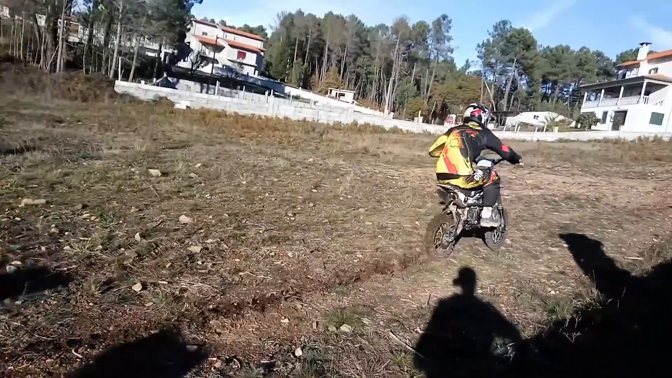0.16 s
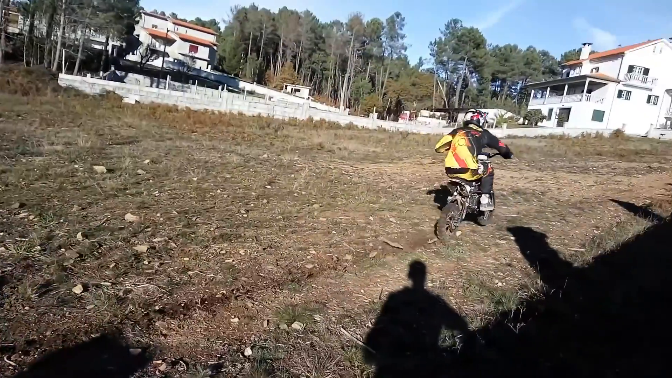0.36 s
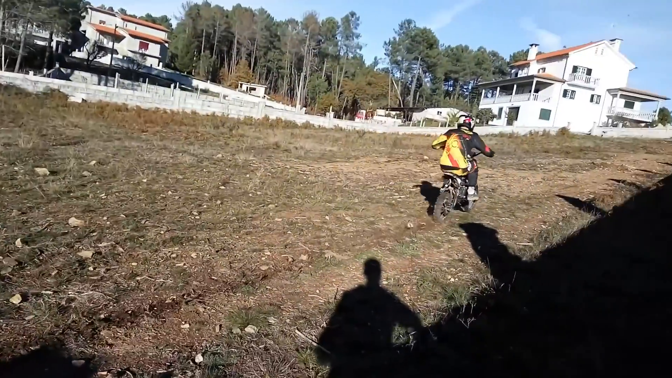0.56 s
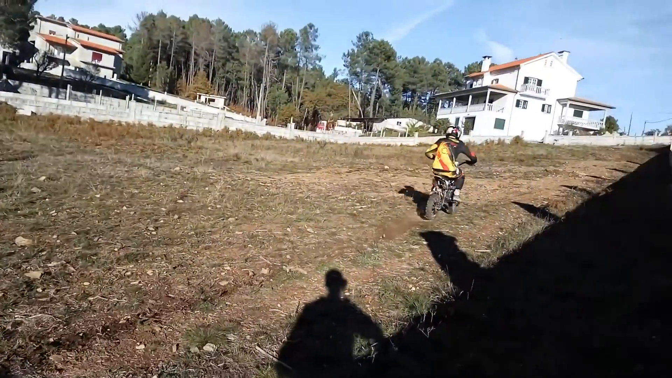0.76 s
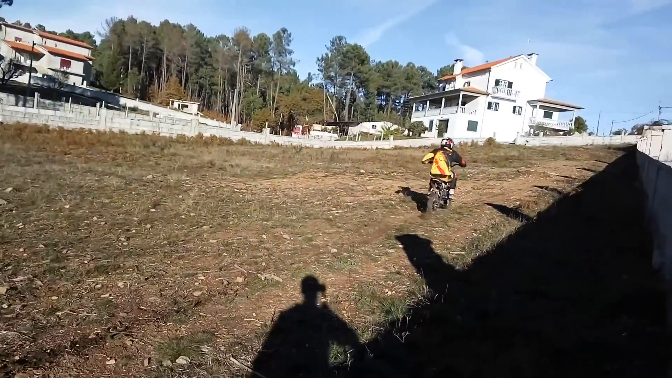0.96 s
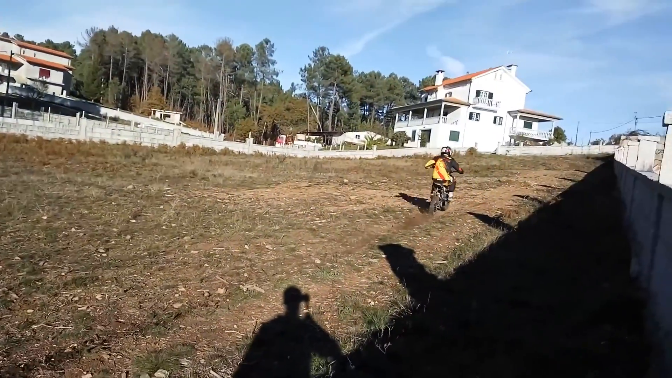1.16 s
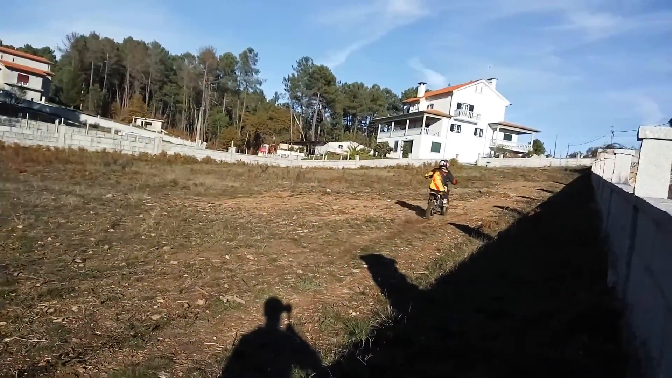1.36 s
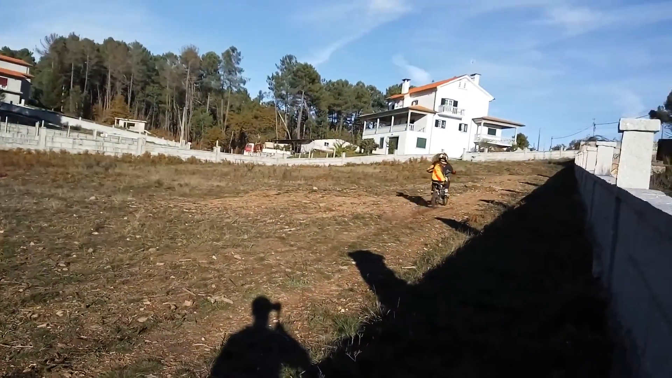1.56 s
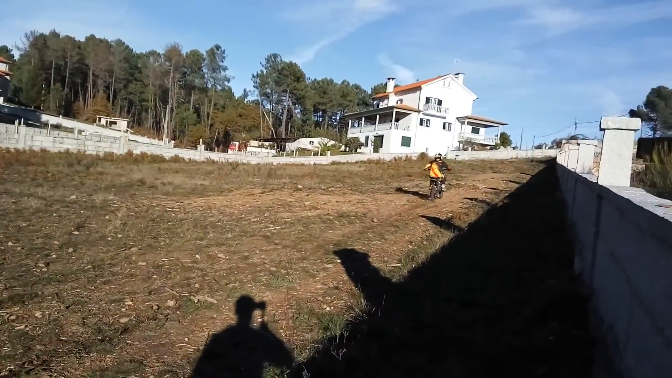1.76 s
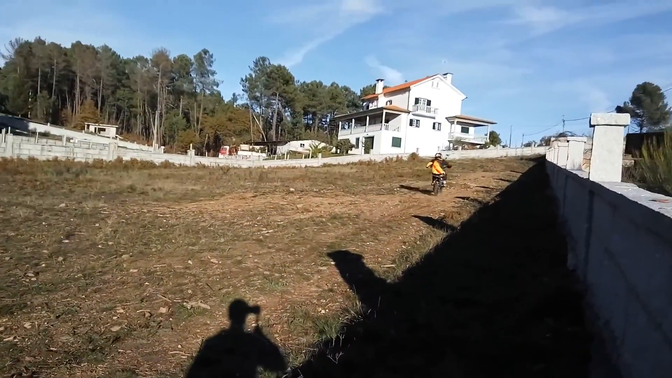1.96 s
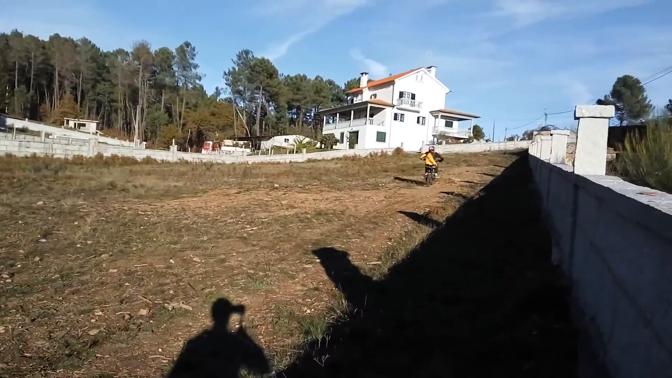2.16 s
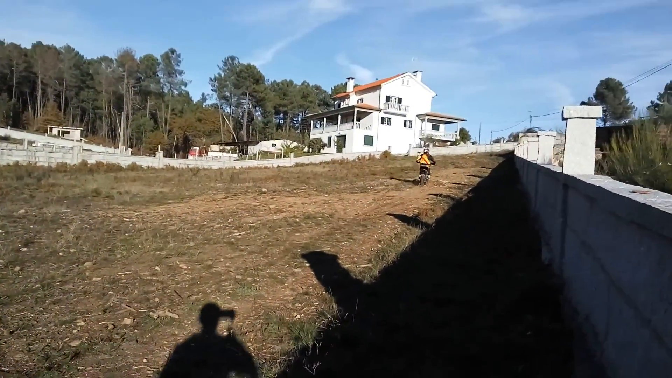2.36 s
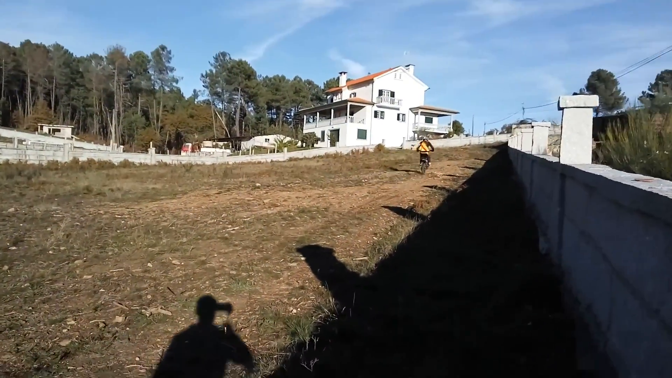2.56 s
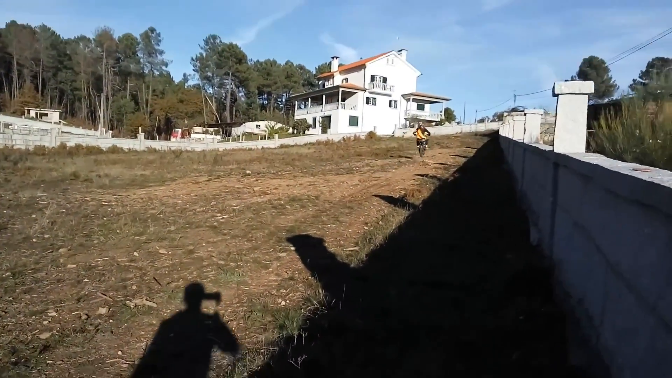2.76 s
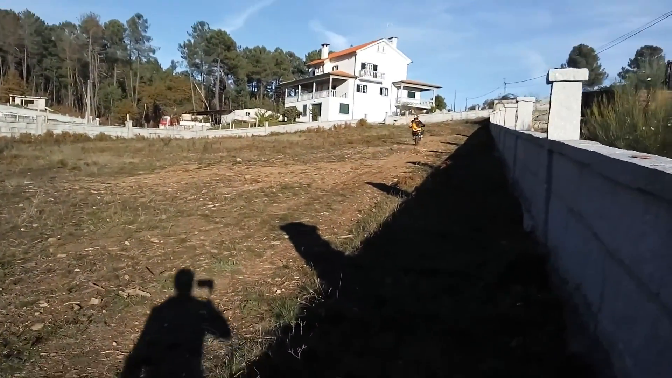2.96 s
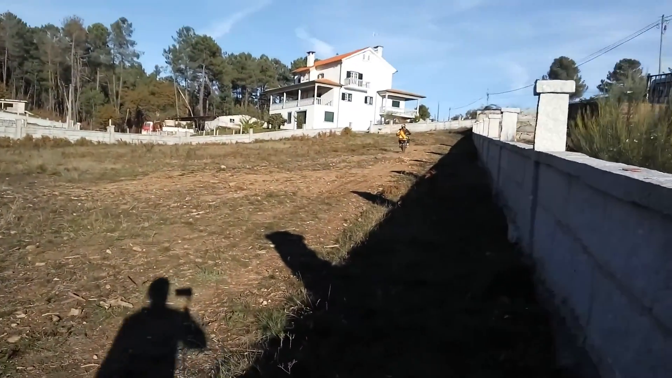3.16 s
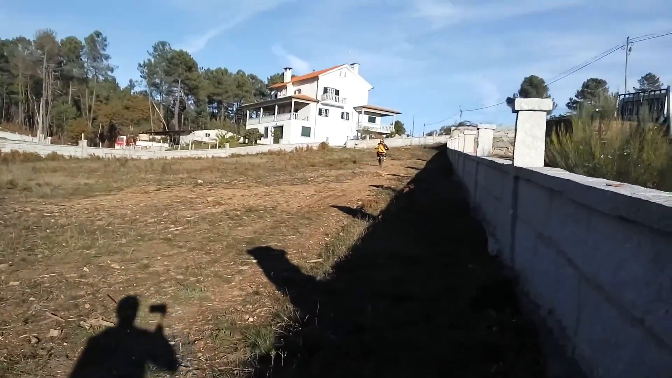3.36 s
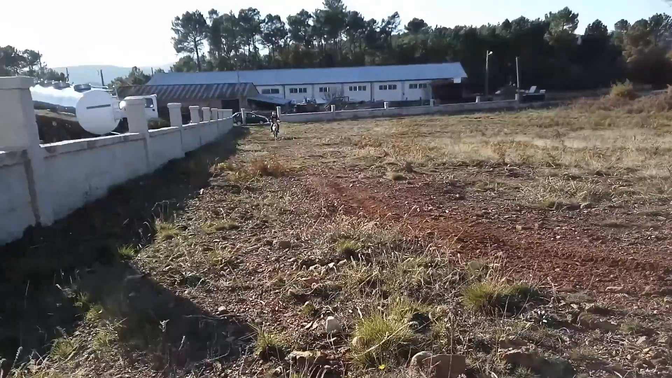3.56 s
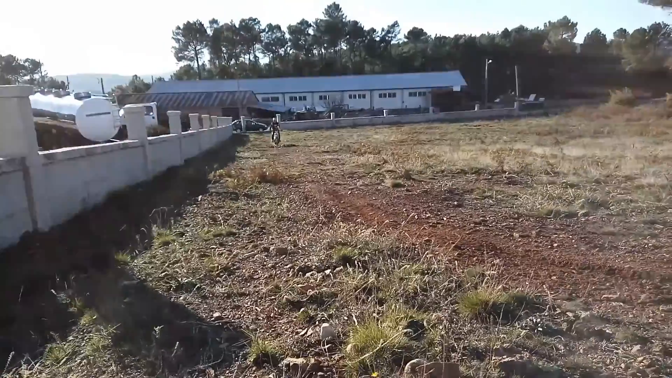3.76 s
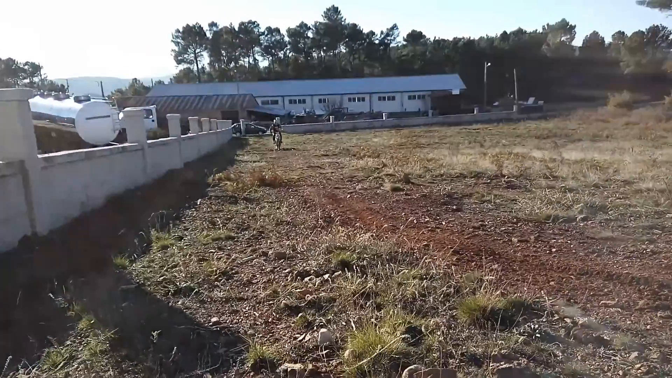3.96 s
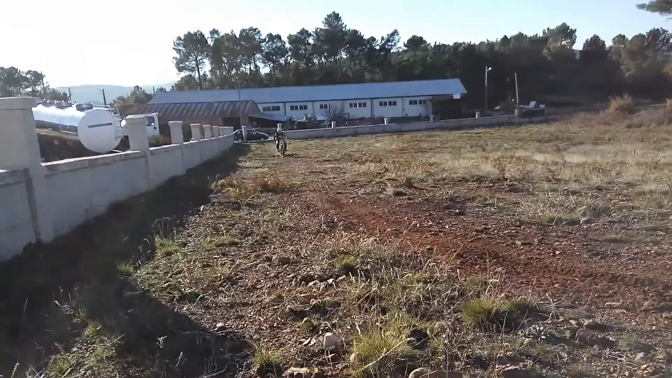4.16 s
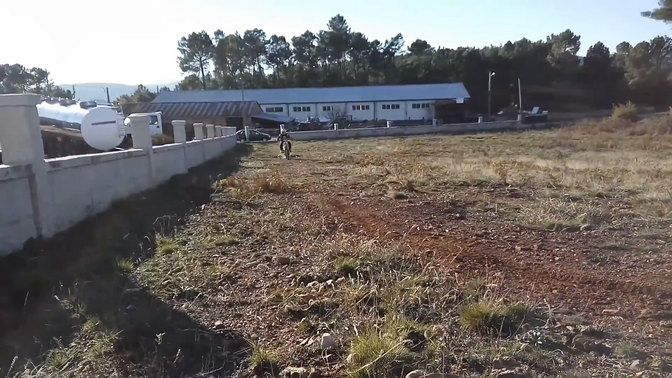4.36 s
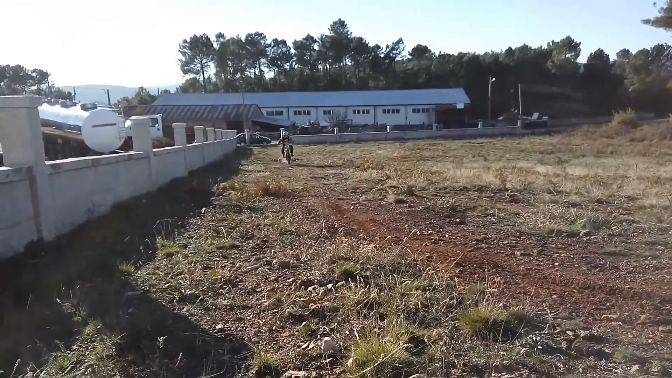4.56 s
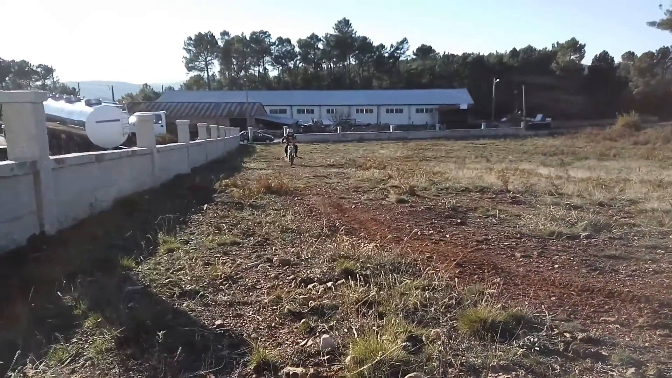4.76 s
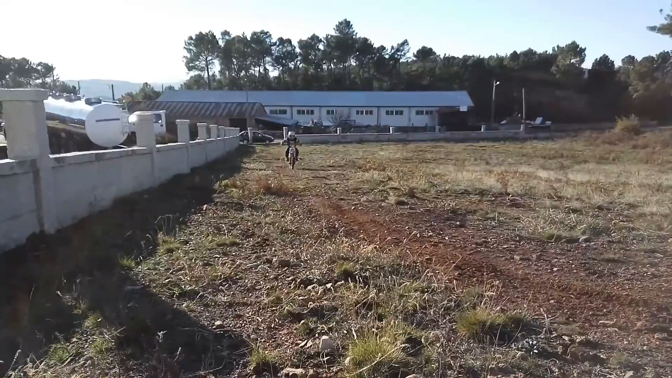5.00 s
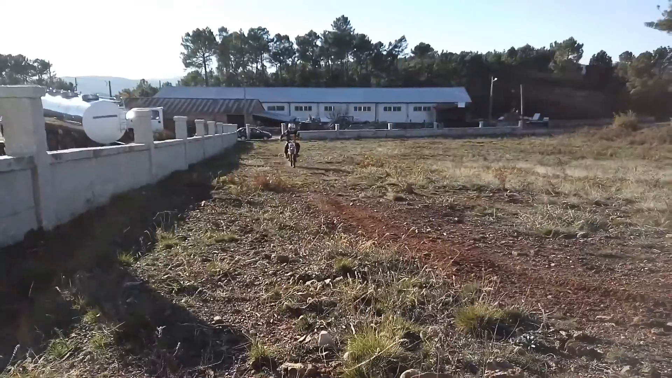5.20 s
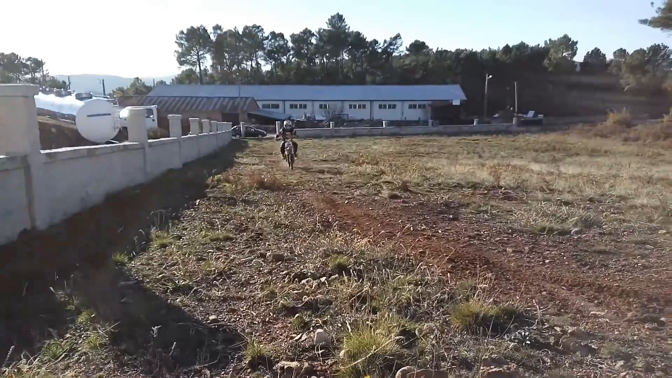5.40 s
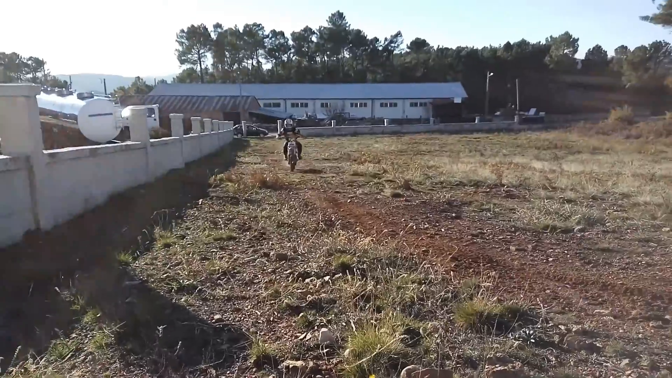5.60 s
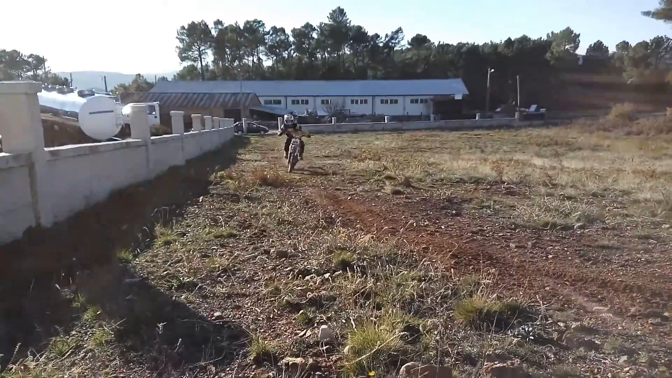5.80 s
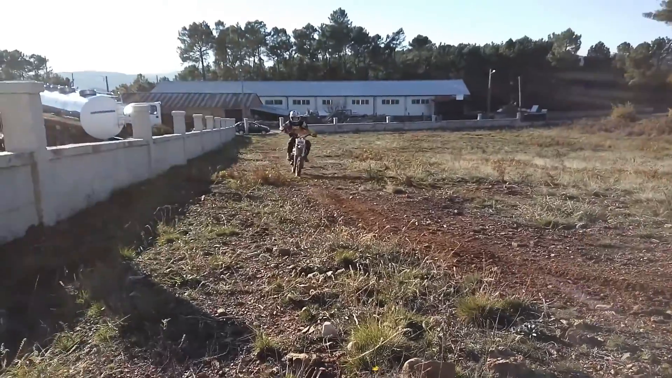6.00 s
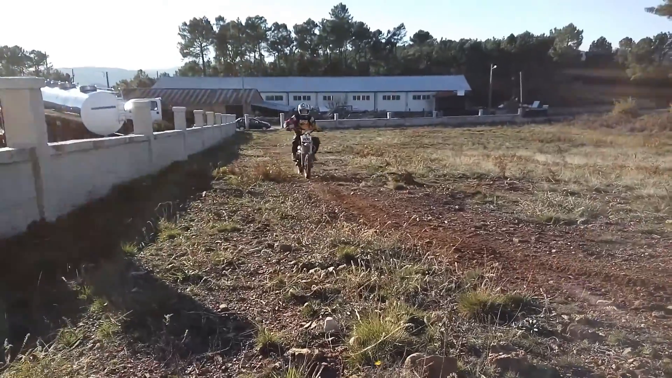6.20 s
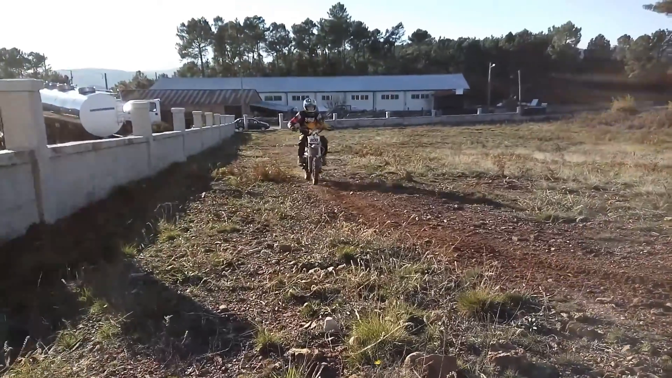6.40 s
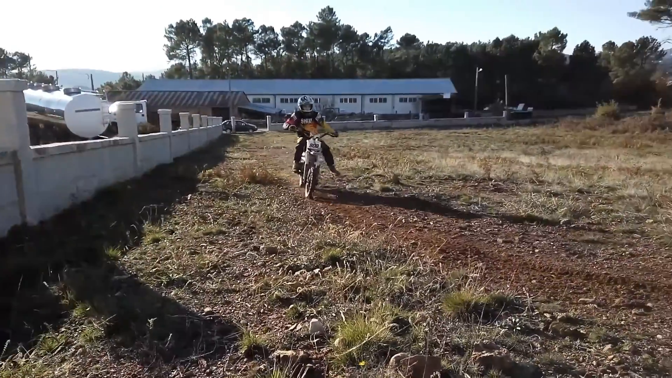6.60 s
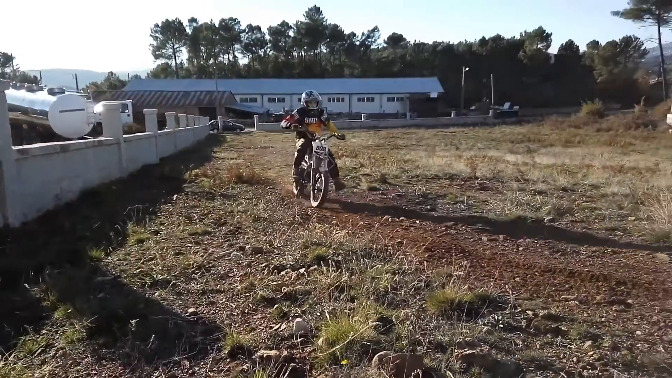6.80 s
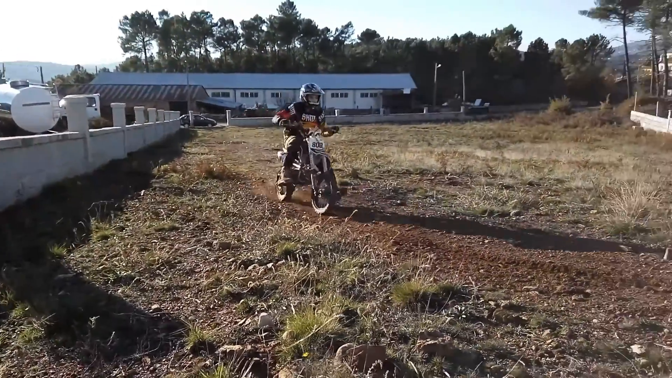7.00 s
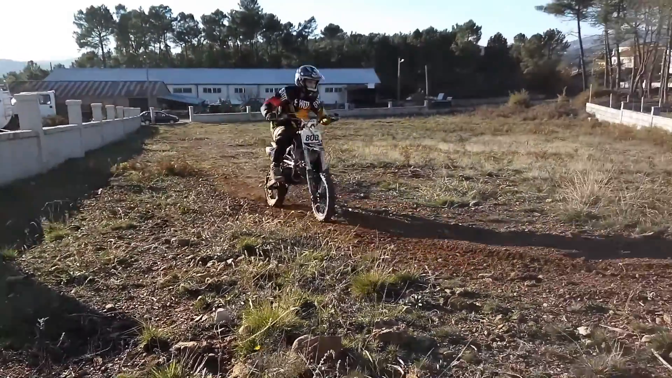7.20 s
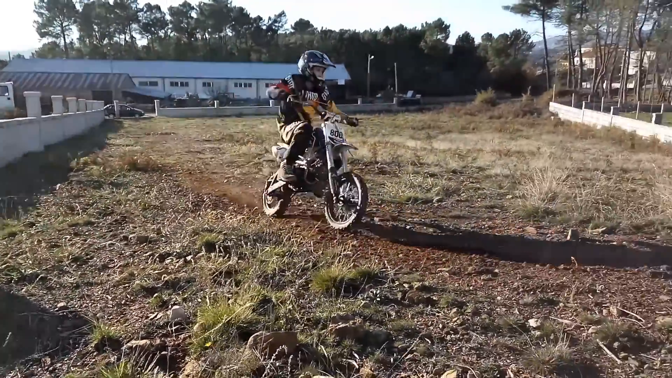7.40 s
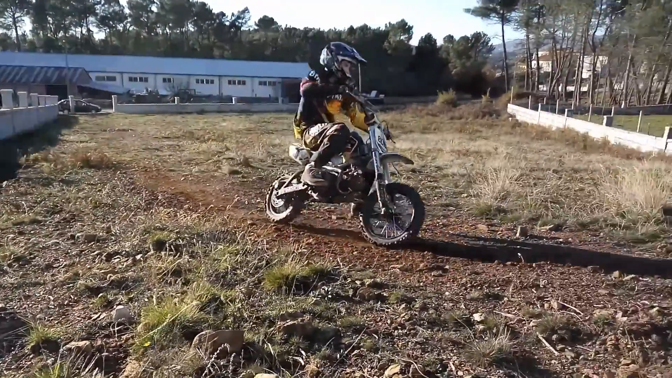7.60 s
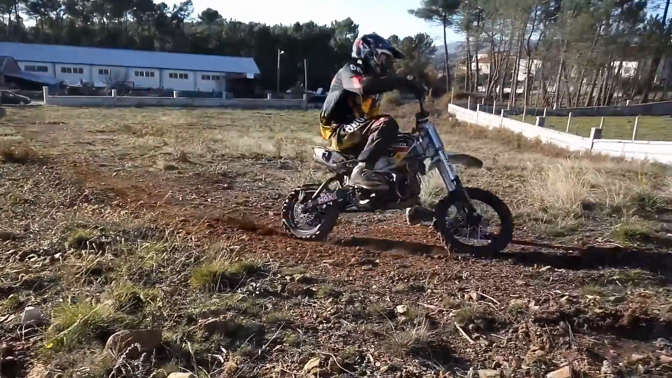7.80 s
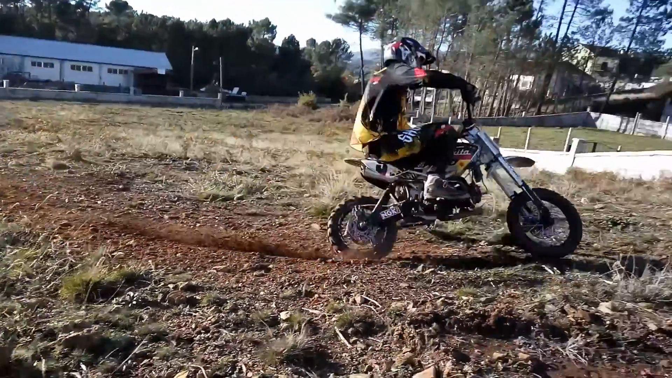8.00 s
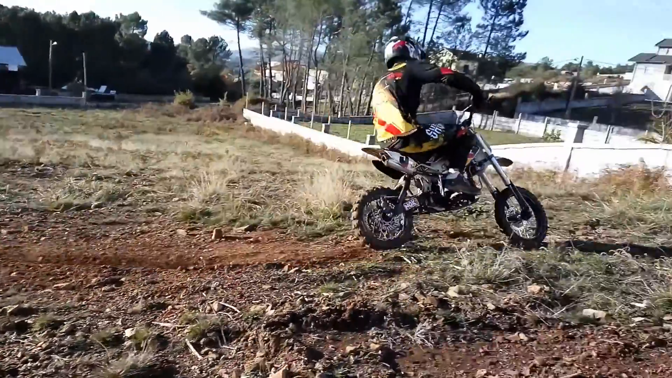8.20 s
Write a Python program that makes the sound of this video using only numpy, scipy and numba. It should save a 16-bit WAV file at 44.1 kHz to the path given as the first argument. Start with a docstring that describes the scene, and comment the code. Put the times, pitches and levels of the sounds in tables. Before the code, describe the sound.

A small single-cylinder dirt bike revs close by and rides away over an open field, its buzzy exhaust rising and dipping as it grows faint and dull. It then comes back with short bursts of throttle, slows to a low putter and gives two loud blips near the microphone. Light engine rattle runs under the exhaust, with faint wind on the microphone.

```python
"""Open field with a low wall. A small single-cylinder four-stroke dirt bike rides away, returns,
and brakes close by. Each firing rings the exhaust and lets out a puff of gas; valves and chain
rattle in the casing. Ground and wall return echoes; distance dulls the treble. Wind brushes the
two microphone ports, and the loudest firings overload the input."""
import sys
import numpy as np
from scipy import signal
from scipy.io import wavfile
from scipy.ndimage import uniform_filter1d, map_coordinates
from numba import njit

SR = 44100
rng = np.random.default_rng(int(sys.argv[2]) if len(sys.argv) > 2 else 0)


def store_pcm(level_fs):
    """Save levels as 16-bit WAV."""
    pcm = np.round(np.clip(level_fs, -1, 1) * 32767).astype(np.int16)
    wavfile.write(sys.argv[1], SR, np.atleast_2d(pcm).T)


N = 363825

# Firing rate: t/s, f/Hz
FIRING_RATE = [(0, 71.6), (.14, 72.4), (.41, 83.3), (.76, 85), (.97, 73.6), (1.11, 57), (1.46, 62),
               (1.88, 69.2), (1.95, 65.7), (2.23, 56.8), (2.35, 53), (2.55, 68), (2.7, 65.6), (2.77, 56),
               (2.88, 59), (3.07, 50.5), (3.14, 45), (3.25, 55), (3.41, 64.6), (3.55, 59.3), (3.85, 57),
               (3.99, 62.3), (4.17, 58.6), (4.69, 70.9), (4.89, 66.3), (5.0, 59), (5.1, 67.7), (5.48, 49.4),
               (5.78, 54.2), (6.03, 61), (6.19, 48.5), (6.64, 37), (6.89, 34.2), (6.97, 28.2), (7.1, 28.4),
               (7.24, 30), (7.31, 38.6), (7.4, 41.3), (7.48, 30), (7.56, 30), (7.64, 31), (7.72, 36.4),
               (7.8, 39.2), (7.97, 44.8), (8.04, 43), (8.14, 39.6), (8.25, 32.6)]
# Moments on which a firing is timed: t/s
FIRING_ANCHORS = [1.103, 1.312, 1.455, 2.391, 2.798, 2.868, 5.039, 6.776, 6.855, 7.133, 7.273, 7.73, 7.791,
                  8.003]
# Rear wheel skips a bump, engine races: t/s, added rate/Hz
WHEEL_HOPS = [(1.361, 13), (2.068, 9.6), (4.291, 7.3)]
# Throttle: open/s, close/s, gas boost/dB
THROTTLE_BURSTS = [(-.1, .76, 2.5), (1.04, 1.3, 8.5), (1.47, 1.58, 3), (1.9, 2.06, 2), (2.4, 2.72, 2.5),
                   (2.78, 2.95, 2), (3.22, 3.41, 2.5), (4.24, 4.87, 6), (5.02, 5.16, 10), (5.91, 6.04, 9.5),
                   (7.08, 7.38, 10.5), (7.73, 8.03, 9.5)]
# Engine stumbles: start/s, stop/s, added scatter/dB
STUMBLES = [(2.34, 2.36, 8.5), (2.77, 2.8, 9.5), (3.08, 3.15, 5), (6.7, 7.05, 3), (8.12, 8.25, 2)]
# Levels, throttle shut: t/s, boom/dB, ring/dB, bark/dB, howl/dB, gas/dB, rattle/dB
SHUT_LEVELS = [(0, -9, -25, -18, -29.5, -24.5, -25.5), (.4, -11, -25, -17.5, -31.5, -19, -22),
               (.79, -18, -19, -19.5, -31, -24.5, -27), (.99, -18, -24, -27, -51, -28, -20),
               (1.06, -16.5, -23.5, -22, -31, -29, -54), (1.4, -11, -26, -21, -31, -32, -41),
               (2.0, -14.5, -22.5, -22.5, -38.5, -33.5, -40.5), (2.3, -22.5, -26, -31, -69, -47, -40.5),
               (2.7, -23.5, -30.5, -33.5, -67, -46.5, -46), (2.77, -20.5, -30.5, -36.5, -64, -45, -44.5),
               (2.9, -25.5, -21.5, -34.5, -65, -45.5, -50.5), (3.15, -26, -27, -39.5, -61, -46.5, -50.5),
               (3.4, -25.5, -30, -31, -78, -46.5, -47), (3.46, -30.5, -31, -39, -59, -46.5, -45.5),
               (3.9, -28, -28, -34, -54, -70, -52.5), (3.97, -24, -40, -39.5, -57, -74, -49.5),
               (4.2, -19.5, -43.5, -27.5, -48, -69, -44), (4.6, -16, -63, -22, -39, -58, -36.5),
               (5.0, -18, -30.5, -23.5, -44.5, -46, -38.5), (5.3, -19.5, -31.5, -24.5, -41, -46, -38.5),
               (5.55, -24, -30, -29.5, -45, -64, -44), (6.0, -19, -23, -27.5, -40.5, -43, -41.5),
               (6.22, -22.5, -24.5, -34, -47, -45, -39.5), (6.9, -26, -20, -32, -57, -43, -43),
               (6.96, -33, -30, -43, -83, -45, -38), (7.06, -31, -29, -44, -63, -50, -53.5),
               (7.2, -20, -19.5, -27.5, -63, -40, -44.5), (7.34, -20.5, -21, -27, -59, -41, -42.5),
               (7.45, -24, -30, -41.5, -75, -40.5, -40.5), (7.9, -18, -13, -22.5, -51, -28.5, -32),
               (8.12, -10.5, -16, -31, -49, -31, -33), (8.25, -12.5, -26, -74, -62, -37, -39.5)]
# Silencer boom: f/Hz, width/Hz, level/dB
SILENCER_MODES = [(124.7, 39.5, 18), (72.5, 18, -21)]
# Pipe ring: t/s, f/Hz, width/Hz
PIPE_RING = [(0, 239, 98), (6.0, 244, 85.7), (6.85, 217, 60), (7.03, 171, 28), (7.25, 252, 65),
             (7.55, 203.5, 61), (8.25, 234, 91)]
# Tailpipe as the gas heats and the bike turns: t/s, bark/Hz, howl/Hz, crack/dB
TAILPIPE = [(0, 486, 950, -31), (.6, 507, 1080, -27), (.95, 435, 795, -39), (1.08, 393, 656, -29),
            (1.35, 370, 675, -30), (2.2, 395, 640, -41.5), (2.6, 489, 640, -54), (4.3, 481, 827, -68),
            (4.55, 478, 894, -69), (4.96, 398, 770, -66), (5.1, 469, 813, -61), (5.45, 347, 730, -72),
            (5.8, 351, 610, -69), (6.9, 330, 566, -73), (8.25, 398, 630, -57)]
# Tailpipe crack: f/Hz, width/Hz, level/dB
CRACK_MODES = [(1008, 130, -7), (1495, 110, -1.5), (1830, 120, 2.5), (2350, 180, -11.5), (3100, 140, -8),
               (3800, 160, -6.5)]
# Pipe sings: start/s, stop/s, level/dB
SINGING_SPANS = [(0.268, 0.355, -10.5), (0.422, 0.752, -19), (0.763, 0.998, -20.5), (1.44, 2.09, -28),
                 (3.676, 3.912, -17.5), (4.216, 4.366, -28), (4.399, 4.869, -29), (5.093, 5.462, -27),
                 (5.558, 5.919, -32), (6.06, 6.301, -11), (6.068, 6.234, -19.5), (6.298, 6.445, -13.5),
                 (6.47, 6.679, -14.5), (6.69, 6.92, -28), (7.389, 7.721, -9.5)]
# Firing harmonic sung in each span: order
SINGING_ORDERS = [3, 6, 5, 6, 4, 8, 7, 7, 6, 5, 6, 5, 6, 5, 4]
# Gas noise: f/Hz, width/Hz, level/dB
GAS_BANDS = [(1085, 670, -3.5), (1650, 570, -4.5), (2207, 430, -1.5), (5300, 6100, -8.5)]
# Casing resonances: f/Hz, width/Hz, level/dB
CASING_MODES = [(1953, 50, -6.5), (2730, 70, -4.5), (3617, 98, -3), (4210, 220, -3), (4717, 160, -3),
                (5280, 54, -3.5), (5800, 54, -8.5), (6280, 47, -8.5)]
# Single casing rings that stand out: start/s, stop/s, f/Hz, level/dB
CASING_RINGS = [(.8, .93, 1183, -30.5), (0.796, 1, 1564, -30), (.87, 0.997, 1940, -28),
                (0.838, 1.003, 3570, -22), (.87, 0.996, 6090, -26), (1.037, 1.236, 3780, -22),
                (1.126, 1.317, 3260, -25.5), (5.58, 5.78, 2700, -46), (5.92, 6.038, 4150, -41),
                (6.03, 6.301, 2740, -42), (6.028, 6.152, 2250, -40.5), (6.24, 6.45, 3600, -43.5)]
# Bike to ports: t/s, ground echo/ms, left lag/samples, wall echo/ratio, bass loss/ratio, top loss/ratio
SOUND_PATH = [(0, 0.65, 4.5, 0.12, 0.095, .05), (1, 0.59, 5, 0.048, 0.14, 0.32),
              (2, 0.39, 4.5, 0.077, 0.36, 0.15), (3.4, 0.25, 3, 0.11, 0.47, 0.64),
              (3.42, 0.24, -1.5, 0.12, 1, 0.82), (6, 0.27, -1.2, 0.11, 0.26, 0.85),
              (6.85, 0.42, -1.5, 0.32, 0.14, 0.8), (7.5, 0.47, 0, .4, 0.13, 0.9),
              (7.85, 0.75, 1, 0.65, 0.08, 0.071)]

BOOM_PULL, RING_PULL, BARK_PULL, SNARL_PULL, RATTLE_PULL = 0.36, 0.11, 0.54, 1.36, 0.85  # dB/throttle dB
HOP_S, OPEN_S, CLOSE_S, STUMBLE_S = 0.08, 0.035, 0.056, 0.048
BARK_WIDTH_HZ, HOWL_WIDTH_HZ, CASING_RING_WIDTH_HZ = 159, 203, 125
CRACK_LAG_S, PUFF_LAG_S, WALL_LAG_S = 0.00188, 0.002585, 0.01204
BEHIND_UNTIL_S = 3.41  # casing modes are twice as wide from behind
SCATTER_DB, BALANCE_DB, WIND_DB, RUMBLE_DB, FIELD_DB = 1.1, 0.8, -52, -16, -54
BASS_HZ, PORT_HZ, AIR_HZ, TOP_HZ = 69.5, 6580, 9000, 15500


def exhaust(since_s, size, bark_hz):
    """A pressure blow per firing, rough with turbulence, rings silencer, pipe and tailpipe."""
    blow = size * since_s / 0.0011 * np.exp(-since_s / 0.00042) + undb(-28.5) * rng.standard_normal(N)
    ring_hz, ring_width_hz = columns(PIPE_RING)
    pipe = [(ring_hz, ring_width_hz, 0)]
    tailpipe = [(bark_hz, BARK_WIDTH_HZ, 0), (1.386 * bark_hz, BARK_WIDTH_HZ, -10)]
    return [even(resonate(blow, modes, steep=True)) for modes in (SILENCER_MODES, pipe, tailpipe)]


def firing_rate(stumble_db):
    """Engine rate/Hz: races on hops, wavers in stumbles, nudged to fire near each anchor."""
    hz = columns(FIRING_RATE)[0] + swells([(t - HOP_S, t, up) for t, up in WHEEL_HOPS], HOP_S, HOP_S)
    hz = hz * (1 + .012 * stumble_db * walk(25))
    anchors = np.r_[0, np.array(FIRING_ANCHORS) - 2 * PUFF_LAG_S] * SR
    slip_turns = np.unwrap(-np.interp(anchors, np.arange(N), np.cumsum(hz) / SR), period=1)
    return hz + np.gradient(np.interp(np.arange(N), anchors, slip_turns)) * SR


@njit
def fire(hz, pace):
    """Cycle index and time since firing; each cycle runs at its own pace."""
    cycle, since_s = np.zeros(len(hz), np.int64), np.empty(len(hz))
    phase, k, t = 0., 0, 0.
    for i in range(len(hz)):
        phase, t = phase + hz[i] * pace[k] / SR, t + 1 / SR
        if phase >= 1:
            phase, k = phase - 1, k + 1
            t = phase / hz[i]
        cycle[i], since_s[i] = k, t
    return cycle, since_s


def snarl(since_s, size, howl_hz):
    """Each steep pressure front gives a hollow howl and a hard tailpipe crack."""
    front = size * np.exp(-since_s / .0001)
    howl = even(resonate(front, [(howl_hz, HOWL_WIDTH_HZ, 0)], steep=True))
    return howl, even(resonate(front, CRACK_MODES))


def singing(turns):
    """Firing harmonics swell in the pipe and choke off."""
    return sum(swells([(start, stop, undb(db))], 0.031, 0.0092) * np.sin(2 * np.pi * order * turns)
               for (start, stop, db), order in zip(SINGING_SPANS, SINGING_ORDERS))


def gas(since_s, size, flow):
    """Noise bursts as the exhaust valve opens, over steadier flow; band levels wander."""
    puff = (size * (since_s / 0.0011) ** 2 * np.exp(-since_s / 0.0011) + flow) * rng.standard_normal(N)
    return even(resonate(puff, [(hz, width, db + 2.55 * walk(4.4)) for hz, width, db in GAS_BANDS]))


def rattle(firing_hz, since_s, size):
    """Two valve ticks per cycle and irregular chain clicks ring the casing."""
    ticks = size * np.exp(-since_s / 0.0024) + 0.18 * np.exp(-np.abs(since_s - .5 / firing_hz) / 0.0078)
    clicks = (ticks + .5) * undb(2.84 * np.minimum(rng.exponential(size=N), 5)) * rng.standard_normal(N)
    spread = np.where(np.arange(N) < BEHIND_UNTIL_S * SR, 2, 1.)
    modes = sum(undb(db + 4.5 * walk(9)) * bandpass(clicks, hz * (1 + 0.024 * walk(4)), spread * width)
                for hz, width, db in CASING_MODES)
    return even(modes + undb(-9.5) * bandpass(clicks, 2900, 5700))


def casing_rings(since_s):
    """One knock per cycle over dense clicks drives narrow rings that come and go."""
    clicks = 7.3 * np.exp(-since_s / .0001) + (np.exp(-since_s / 0.004) + 0.52) * rng.standard_normal(N)
    out = 0
    for start, stop, hz, db in CASING_RINGS:
        ring = resonate(clicks, [(hz * (1 + 0.018 * walk(8)), CASING_RING_WIDTH_HZ, 0)], steep=True)
        out = out + swells([(start, stop, undb(db))], 0.024, 0.052) * even(ring)
    return out


def ground_bounce(x, echo_ms):
    """Direct sound plus ground echo, both late by the puff lag."""
    return delay(x + 0.17 * delay(x, echo_ms * SR / 1000), PUFF_LAG_S * SR)


def wind_and_field(engine_db):
    """Wind on both ports, rumble tracking the engine level, faint field hiss."""
    def noise(hz, width_hz, span_s):
        return even(resonate(rng.standard_normal(N), [(hz, width_hz, 0)], steep=True), span_s)

    gain = undb(WIND_DB) + undb(engine_db + RUMBLE_DB)
    wind = np.array([gain * undb(1.8 * walk(4)) * noise(28, 14, 1.0) for _ in range(2)])
    hiss = np.array([undb(FIELD_DB) * noise(2500, 3200, 0.93) for _ in range(2)])
    return wind.sum(axis=0) + .6 * wind + hiss


def undb(db):
    """dB to gain."""
    return 10 ** (np.asarray(db) / 20)


def columns(table):
    """Table columns interpolated per sample."""
    times_s, *values = np.transpose(table)
    return [np.interp(np.arange(N) / SR, times_s, column) for column in values]


def swells(rows, rise_s, fall_s):
    """Sum of rise-hold-fall envelopes."""
    t = np.arange(N) / SR
    return sum(size * np.clip(np.minimum((t - start) / rise_s, 1 + (stop - t) / fall_s), 0, 1)
               for start, stop, size in rows)


def walk(rate_hz):
    """Smooth random curve, spread near 1."""
    hold = int(SR / rate_hz)
    steps = np.repeat(rng.standard_normal(N // hold + 1), hold)
    return 1.5 * uniform_filter1d(uniform_filter1d(steps, hold), hold)[:N]


def even(x, span_s=0.23):
    """Running rms set to 1."""
    span = int(span_s * SR)
    return x / np.sqrt(uniform_filter1d(uniform_filter1d(x ** 2, span), span) + 1e-12)


def delay(x, samples):
    """Moving, interpolated delay."""
    return map_coordinates(x, [np.arange(N) - samples], order=3, mode="nearest")


def resonate(x, modes, steep=False):
    """Sum of resonances in alternating polarity; steep filters twice."""
    out = 0
    for k, (hz, width_hz, db) in enumerate(modes):
        band = bandpass(x, hz, width_hz)
        if steep:
            band = bandpass(band, hz, 1.91 * width_hz)
        out = out + (-1) ** k * undb(db) * band
    return out


def bandpass(x, hz, width_hz):
    """Band-pass; centre and width are numbers or curves."""
    return state_variable(x, np.tan(np.pi * hz / SR) + np.zeros(N), width_hz / hz + np.zeros(N))


@njit
def state_variable(x, tune, damping):
    """Band-pass core, unity peak gain, retuned per sample."""
    y, band, low = np.empty(len(x)), 0., 0.
    for i in range(len(x)):
        v = (band + tune[i] * (x[i] + 1e-18 - low)) / (1 + tune[i] * (tune[i] + damping[i]))
        band, low, y[i] = 2 * v - band, low + 2 * tune[i] * v, damping[i] * v
    return y


def scene():
    """Bike, echoes and wind at the two ports."""
    boom_db, ring_db, bark_db, howl_db, gas_db, rattle_db = columns(SHUT_LEVELS)
    bark_hz, howl_hz, crack_db = columns(TAILPIPE)
    echo_ms, lag_samples, wall_gain, bass_loss, top_loss = columns(SOUND_PATH)
    throttle_db = swells(THROTTLE_BURSTS, OPEN_S, CLOSE_S)
    ring_db = ring_db + RING_PULL * throttle_db
    bark_db = bark_db + BARK_PULL * throttle_db
    gas_db = gas_db + throttle_db
    rattle_db = rattle_db + RATTLE_PULL * throttle_db

    stumble_db = swells(STUMBLES, STUMBLE_S, STUMBLE_S)
    firing_hz = firing_rate(stumble_db)
    timing_draw, size_draw, edge_draw = rng.standard_normal((N // 300, 3)).T  # per cycle
    pace = 1 + 0.0035 * np.diff(timing_draw, append=0)
    cycle, since_s = fire(firing_hz, pace)
    size = undb((SCATTER_DB + stumble_db) * size_draw[cycle])

    boom, ring, bark = exhaust(since_s, size, bark_hz * (1 + .03 * walk(5)))
    ring, bark = (undb(1.43 * walk(6)) * voice for voice in (ring, bark))  # slow random level waver
    howl, crack = snarl(since_s, size * undb(1.4 * edge_draw[cycle]), howl_hz)
    front = undb(SNARL_PULL * throttle_db) * (undb(howl_db) * howl + undb(crack_db) * crack)
    pipe = undb(boom_db + BOOM_PULL * throttle_db) * boom - undb(ring_db) * ring + undb(bark_db) * bark
    pipe = pipe + singing(np.cumsum(firing_hz * pace[cycle]) / SR)
    pipe = pipe - bass_loss * bandpass(pipe, 60, 100) - delay(front, CRACK_LAG_S * SR)
    pipe = pipe + wall_gain * delay(pipe, WALL_LAG_S * SR)

    puff = undb(3.53 * edge_draw[cycle]) * (1 - 0.68 * top_loss)  # distance smears the puffs
    flow = 0.15 * undb(-.6 * throttle_db) + 0.18 * bass_loss  # less under load, more far away
    shared = undb(gas_db) * gas(since_s, puff, flow) + undb(rattle_db) * rattle(firing_hz, since_s, puff)
    shared = ground_bounce(shared + casing_rings(since_s), echo_ms)

    air_highpass = signal.butter(2, AIR_HZ, "high", fs=SR, output="sos")
    ports = []
    for side in (1, -1):  # left, right; walls and tussocks scatter differently to each
        scattered = undb(gas_db - 1) * gas(since_s, puff, flow)
        scattered += undb(rattle_db + 1.5) * rattle(firing_hz, since_s, puff)
        smear = undb(-11) * delay(pipe, SR * (0.012 + 0.002966 * side))
        port = undb(BALANCE_DB * side / 2) * delay(pipe + shared, lag_samples * side / 2)
        port = port + ground_bounce(scattered, echo_ms) + smear
        ports.append(port - top_loss * signal.sosfiltfilt(air_highpass, port))
    return np.array(ports) + wind_and_field(np.maximum(boom_db, ring_db))


def record(dry):
    """Microphone: bass roll-off, treble shelf, input clipping, top cut."""
    x = signal.sosfilt(signal.butter(2, BASS_HZ, "high", fs=SR, output="sos"), dry)
    x = signal.sosfilt(signal.butter(8, PORT_HZ, fs=SR, output="sos"), x) + undb(-13.5) * x
    x = np.clip(x, -1, 1)
    return signal.sosfilt(signal.ellip(8, .2, 70, TOP_HZ, fs=SR, output="sos"), x)


dry = scene()
out = record(dry)
store_pcm(out)
```